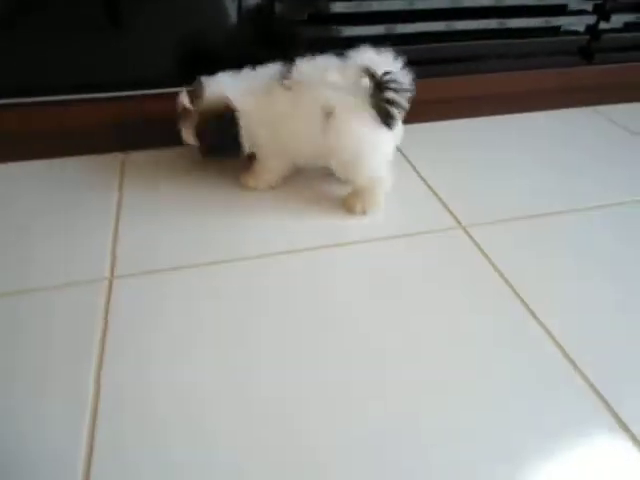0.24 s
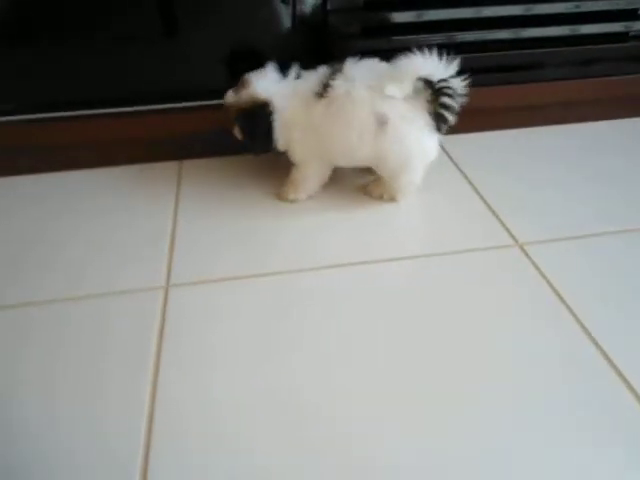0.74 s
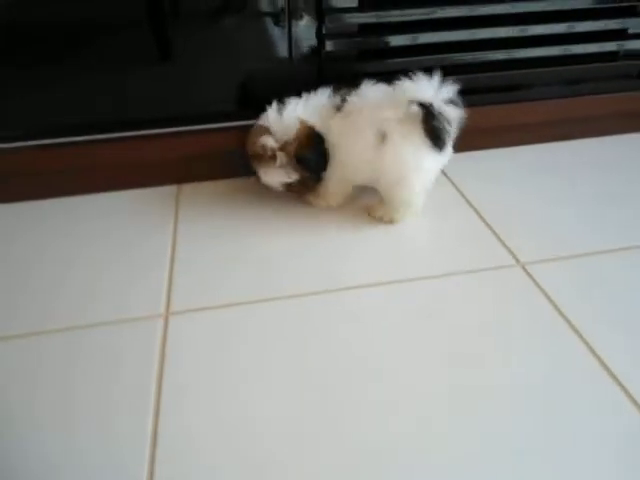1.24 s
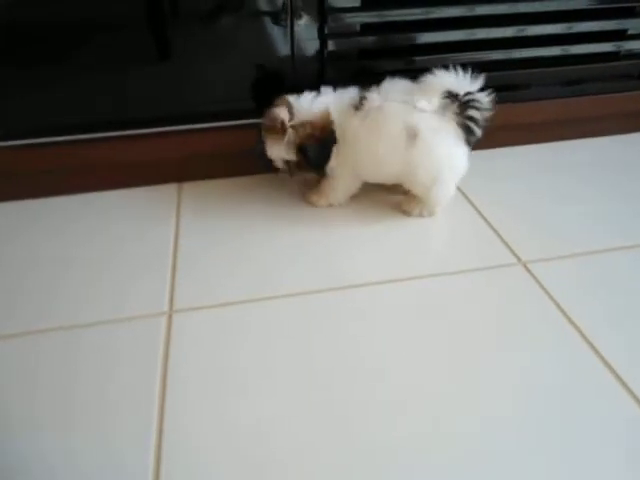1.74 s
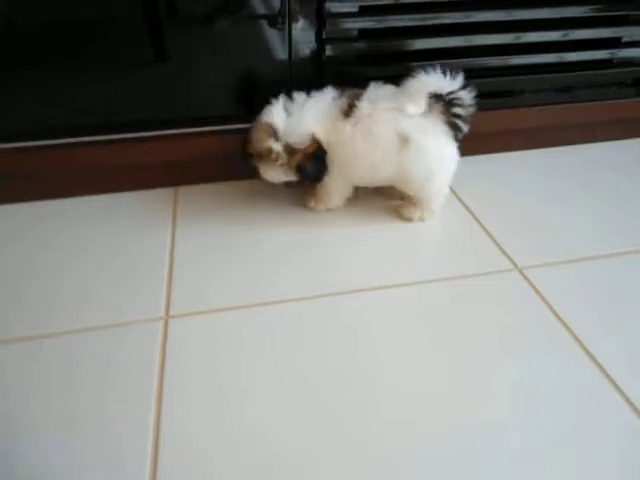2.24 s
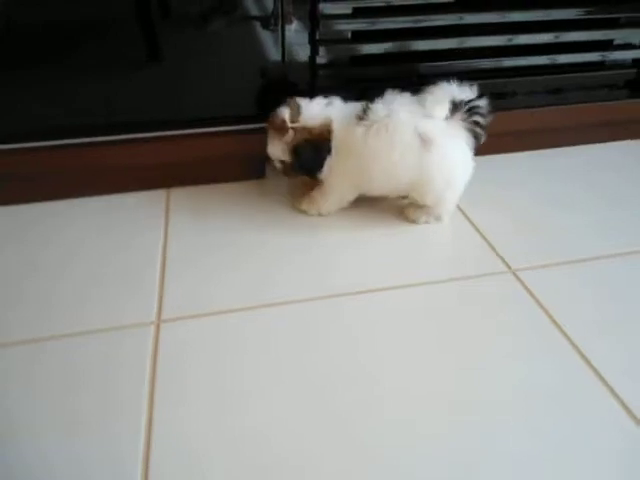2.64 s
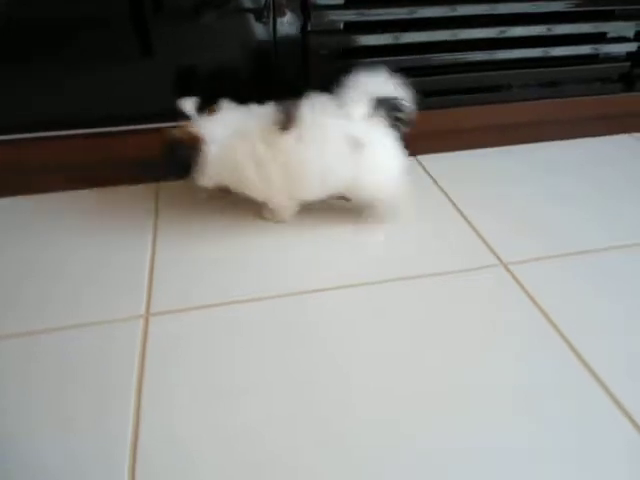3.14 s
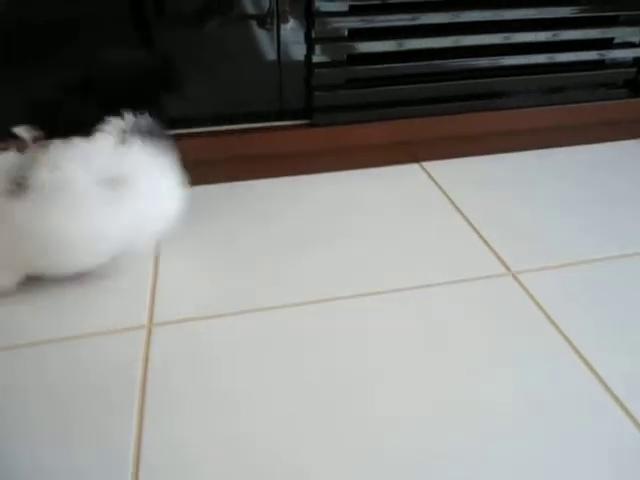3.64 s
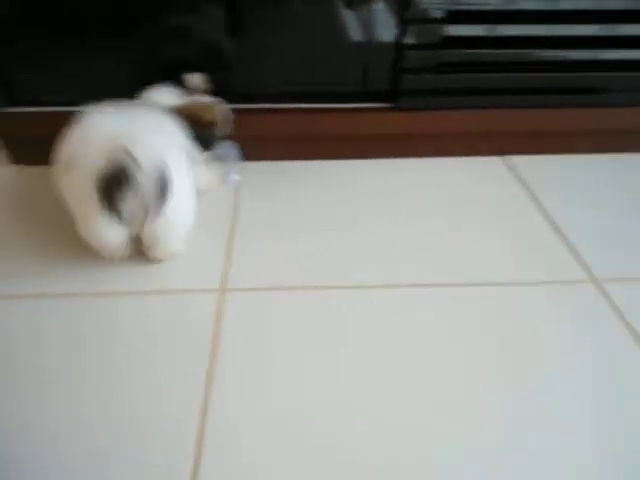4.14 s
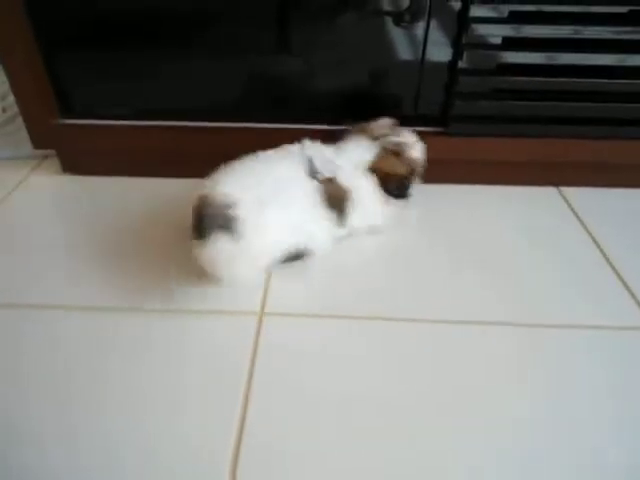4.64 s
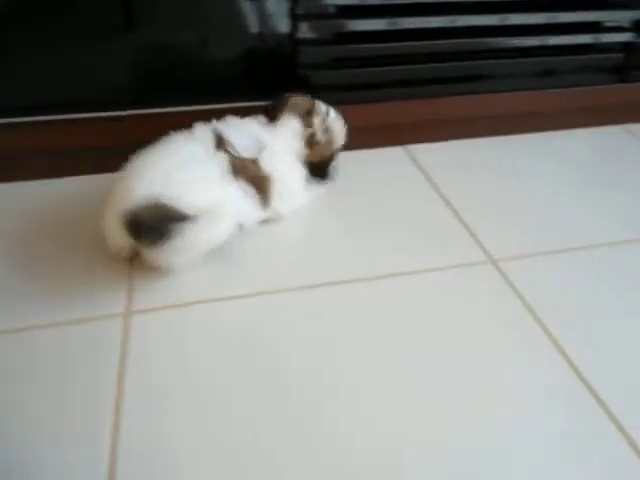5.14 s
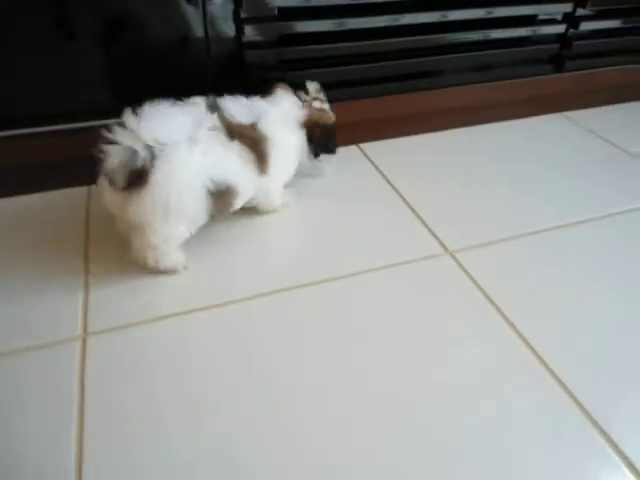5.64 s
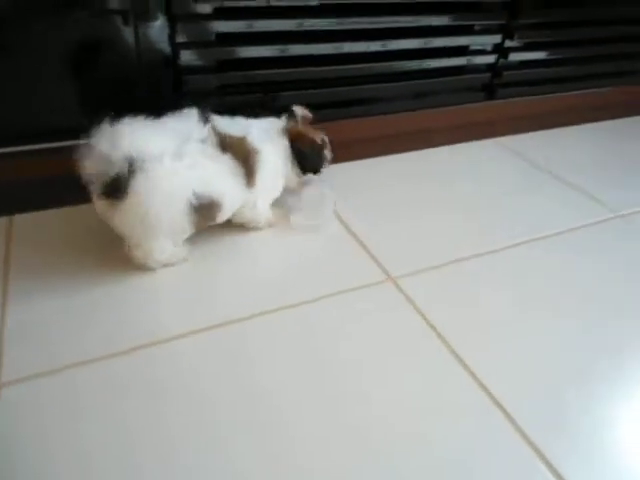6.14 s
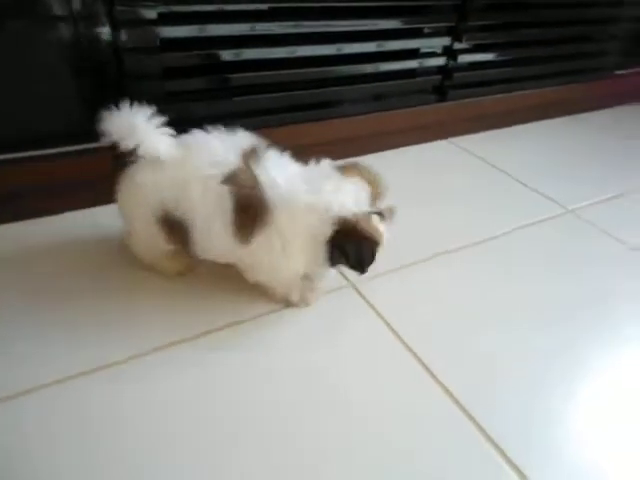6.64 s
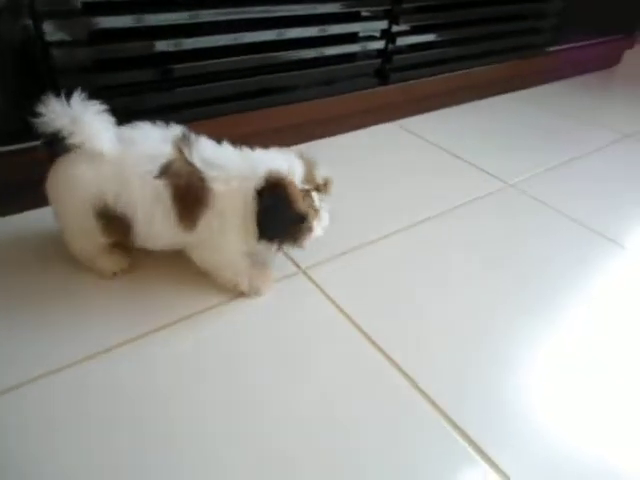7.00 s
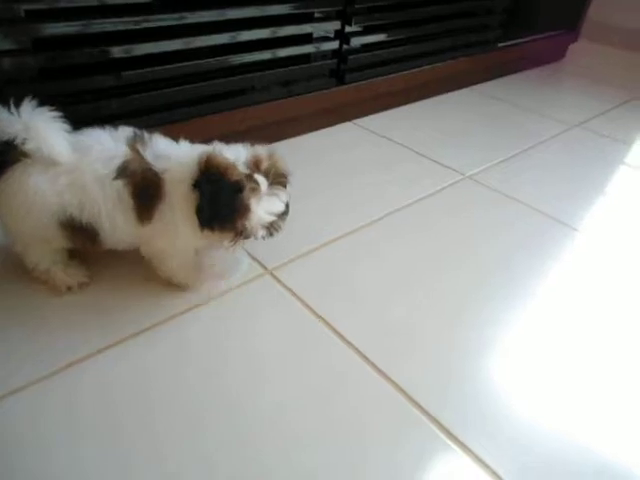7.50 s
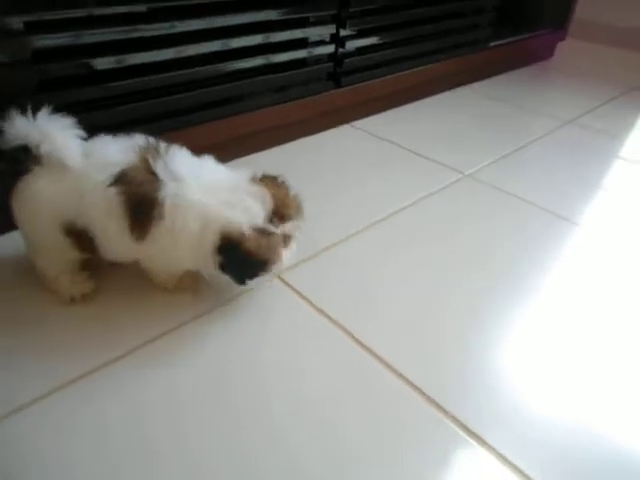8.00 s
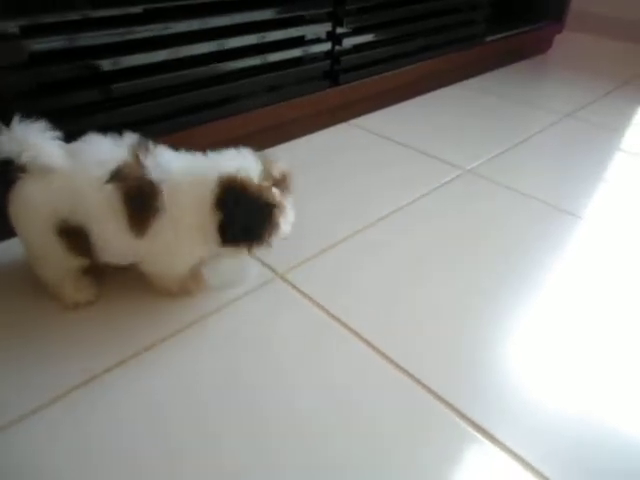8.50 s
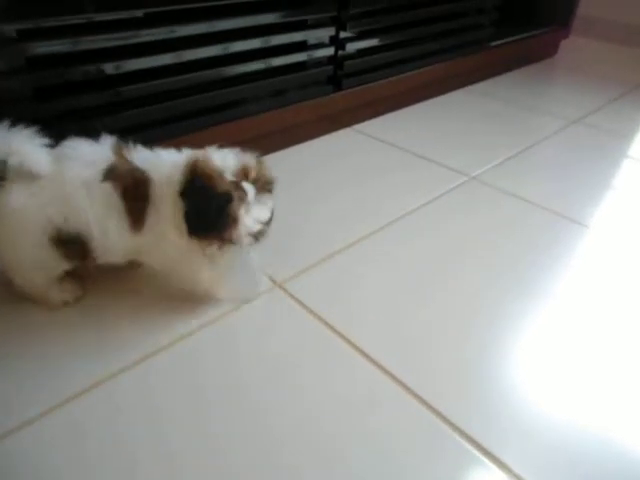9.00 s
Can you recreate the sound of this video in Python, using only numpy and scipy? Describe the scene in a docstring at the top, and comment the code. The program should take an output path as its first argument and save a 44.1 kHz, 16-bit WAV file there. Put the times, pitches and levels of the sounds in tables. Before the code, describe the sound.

A light plastic cup bounces, rattles and slides on tiles as a puppy paws it, its claws clicking in a bare room.

```python
"""A bare, echoing room with a tiled floor, where a puppy noses and paws a small plastic cup about.
The cup knocks, bounces and rattles as each blow rings its hollow modes; claws and the hard rim
add sharp ticks and a grainy scrape, and paws land with soft thuds. Building rumble and microphone
hiss lie below; the loudest knocks overload a small camera."""
import sys
import numpy as np
from scipy import signal
from scipy.fft import rfft, irfft, next_fast_len
from scipy.io import wavfile

SR = 44100
rng = np.random.default_rng(int(sys.argv[2]) if len(sys.argv) > 2 else 0)


def transcribe(signal):
    """Save signal, clipped to [-1, 1], as a 16-bit WAV file at the path in sys.argv[1]."""
    frames = np.atleast_2d(signal).T
    limited = np.clip(frames, -1, 1)
    pcm = np.round(limited * 32767).astype(np.int16)
    wavfile.write(sys.argv[1], SR, pcm)


N = 408366

# knocks of the cup on the tiles: (time [s], relative level [dB], hollow pitch [Hz], tick vs knock [dB])
CUP_KNOCKS = [(0.015, -6.5, 737, -2), (0.207, -12.5, 860, -5.5), (0.239, -15.5, 877, -7),
              (0.29, -13, 747, -7.5), (0.392, -17.5, 460, -27), (0.443, -25.5, 1010, 6.5),
              (0.621, -24.5, 467, -1), (0.995, -17, 720, -35), (1.072, -24.5, 446, -2),
              (1.131, -21, 570, -6), (1.176, -21, 599, -1), (1.383, -21.5, 738, -21),
              (1.478, -13.5, 985, -19), (1.52, -12.5, 634, -9.5), (1.725, -8.5, 750, -24),
              (1.735, -12, 700, -35), (1.747, -16, 616, -16.5), (1.863, -22.5, 788, -32),
              (1.895, -21.5, 780, -20), (2.05, -24, 708, -14), (2.065, -14, 638, -11), (2.152, -28, 719, 1),
              (2.207, -21.5, 592, -4), (2.337, -24, 726, -8), (2.928, -11.5, 895, -8),
              (2.978, -22.5, 564, -11), (3.027, -11, 889, -14), (3.064, -18, 934, -25.5),
              (3.11, -14.5, 557, -25), (3.166, -16.5, 748, -12), (3.312, -16, 696, -13),
              (3.332, -7.5, 797, -27), (3.4, -6, 1020, -6), (3.404, -1, 1000, -30), (3.412, -1, 790, -8),
              (3.425, -6, 790, -22), (3.461, -12, 1035, -32), (3.474, -4.5, 890, -15),
              (3.503, -12, 777, -34), (3.539, -13.5, 980, -23), (3.586, -5.5, 945, -28),
              (3.611, 1.5, 956, -22), (3.631, -4.5, 890, -35), (3.652, -9.5, 940, -24),
              (3.661, -4, 920, -25.5), (3.697, -9.5, 975, -34), (3.708, -11.5, 920, -32),
              (3.744, -11.5, 743, -14), (3.77, -12, 670, -29.5), (3.878, -17.5, 580, -24),
              (3.966, -6, 706, -10.5), (4.024, -9.5, 462, -19), (4.052, -5.5, 762, -18),
              (4.18, -17, 755, -26), (4.198, -10.5, 679, -7.5), (4.27, 1, 750, -17),
              (4.308, -5.5, 992, -0.5), (4.316, -3.5, 760, -44), (4.359, 0.5, 750, -10),
              (4.504, -13.5, 770, -24), (4.522, -9.5, 750, -16), (4.574, -11, 997, -41),
              (4.59, 6, 1300, -8), (4.733, -26, 547, 1.5), (4.851, 5.5, 922, -4.5), (4.86, -4.5, 738, 4),
              (4.938, -5, 902, -7), (4.967, -8, 931, -15), (5.203, -5.5, 665, -22), (5.219, -3, 810, -5),
              (5.505, -6.5, 680, -17.5), (5.549, -8, 677, -2.5), (5.639, -2, 915, -15),
              (5.645, -2.5, 850, -8.5), (5.721, -15.5, 960, -9), (5.855, -17, 907, -27.5),
              (5.954, -5.5, 827, -11), (6.038, -18.5, 756, -19), (6.111, -16, 676, -18),
              (6.127, -7.5, 1024, -6.5), (6.138, -5.5, 1056, -9), (6.149, -27, 596, -6),
              (6.158, -7.5, 936, -27), (6.201, -4.5, 843, -16), (6.213, -9.5, 842, -21),
              (6.244, -16, 1010, -13), (6.444, -18, 836, -2.5), (6.526, -12.5, 1020, -27),
              (6.537, -13, 986, -5.5), (6.543, -9, 400, -15), (6.6, -7.5, 873, -6),
              (6.793, -7.5, 600, -10.5), (6.84, -19, 500, -13), (6.997, -19, 520, -14),
              (7.059, -20.5, 732, -11), (7.197, -18, 556, -12), (7.637, -31, 524, -7),
              (7.785, -24.5, 730, 0.5), (7.857, -12, 894, -9), (8.009, -24.5, 1074, -1),
              (8.079, -17.5, 700, -14.5), (8.212, -30.5, 900, -12), (8.374, -27, 680, -1),
              (8.461, -10.5, 810, -12.5), (8.472, -13.5, 760, -23), (8.483, -14.5, 760, -23),
              (8.797, -18.5, 750, -23), (8.849, -25, 650, -3), (8.893, -17, 580, -12),
              (8.928, -20, 702, -21), (9.025, -17, 926, -28), (9.068, -3, 860, -14), (9.077, -7, 840, -28),
              (9.089, -14, 930, -19), (9.107, -19, 768, -19), (9.112, -4.5, 790, -15.5),
              (9.127, -7, 729, -16), (9.145, -32, 866, -30), (9.172, -24, 737, -28), (9.21, -5, 752, -31),
              (9.239, -7.5, 611, -33)]
# the cup is pushed, rocks and slides: (start [s], length [s], relative rattle [dB], relative scrape [dB])
CUP_SLIDES = [(0.0, 0.0079, -25, -31.5), (0.196, 0.37, -39.5, -33.5), (1.118, 0.43, -38.5, -38),
              (1.75, 0.15, -43, -47), (2.05, 0.33, -46.5, -40), (3.014, 0.17, -30.5, -30.5),
              (3.404, 0.33, -34, -34.5), (3.942, 0.12, -29, -29.5), (4.272, 0.17, -30.5, -30),
              (4.599, 0.02, -18.5, -19), (4.871, 0.036, -42, -19), (4.998, 0.02, -31, -46.5),
              (5.243, 0.055, -36, -33.5), (5.562, 0.099, -31, -27), (5.968, 0.1, -35, -30.5),
              (6.118, 0.065, -24.5, -34), (6.237, .1, -44, -38), (6.5, 0.19, -55, -36),
              (7.075, 0.055, -36, -37), (7.97, 0.045, -46.5, -38), (8.873, 0.29, -42, -37),
              (9.208, .1, -49.5, -31.5)]


def from_db(db):
    return 10 ** (np.asarray(db) / 20)


def unit_rms(x):
    return x / np.sqrt(np.mean(x ** 2) + 1e-20)


def at_hz(points, hz):
    """A (frequency [Hz], value) curve read on a log-frequency axis."""
    point_hz, values = np.transpose(points)
    return np.interp(np.log(hz + 1), np.log(point_hz), values)


def coloured_noise(spectrum):
    """Noise shaped by a (frequency [Hz], level [dB]) curve, at rms 1."""
    gain = from_db(at_hz(spectrum, np.fft.rfftfreq(N, 1 / SR)))
    return unit_rms(irfft(rfft(rng.standard_normal(N)) * gain, N))


def ring(drive, hz, t60):
    """One resonance: a unit click sets off a decaying sine of height about 1."""
    radius, angle = from_db(-60 / (t60 * SR)), 2 * np.pi * hz / SR
    return signal.lfilter([0, np.sin(angle)], [1, -2 * radius * np.cos(angle), radius ** 2], drive + 1e-18)


def bursts(times, level_db, t60):
    """An envelope that jumps at the given times and dies away."""
    jumps = np.zeros(N)
    jumps[(times * SR).astype(int)] = from_db(level_db)
    return signal.lfilter([1], [1, -from_db(-60 / (t60 * SR))], jumps + 1e-18)


def struck_cup(onsets, strength_db, hollow_hz, spread_octaves, uneven_db=2.5, travel_s=0.0009):
    """Blows ring the cup; its tilt favours the modes near each blow's hollow pitch."""
    # modes of the plastic cup: (frequency [Hz], relative level [dB], t60 [s])
    modes = [(306, -25, 0.0083), (473, 1.5, 0.036), (614.4, -1.5, 0.028), (692, -3, 0.038),
             (768, -1, 0.042), (915, 0.5, 0.031), (1008, -5.5, 0.063), (1090, -12.5, 0.03),
             (1300, -11, 0.025), (1497, -23, 0.089)]
    hz, level_db, t60 = np.transpose(modes)
    detune = np.log2(hz / hollow_hz[:, None]) / np.clip(spread_octaves, .1, 2)[..., None]
    shares = from_db(level_db - 7.7 * detune ** 2 + uneven_db * rng.standard_normal(detune.shape))
    shares = shares / np.linalg.norm(shares, axis=1, keepdims=True) * from_db(strength_db)[:, None]
    # a blow takes a moment to reach every part of the cup
    delays = (rng.random(detune.shape) * travel_s * SR).astype(int)
    starts = np.minimum(onsets[:, None] + delays, N - 1)
    body = np.zeros(N)
    for k in range(len(modes)):
        clicks = np.zeros(N)
        clicks[starts[:, k]] = shares[:, k]
        body += ring(clicks, hz[k], t60[k])
    # light plastic gives way, so each ring swells over a cycle or two
    return signal.sosfilt(signal.butter(3, [330, 1400], "band", fs=SR, output="sos"), body)


def knocks(trim_db=-2, run_octaves=0.15, rest_octaves=0.85, settle_s=0.13):
    """The cup hits the tiles: a hollow ring topped by a bright tick of claw or rim."""
    # colour of a tick: (frequency [Hz], relative level [dB])
    tick_colour = [(300, -35.5), (900, 26), (1500, 11), (2200, 2.5), (3000, 4), (3700, 4.5), (5000, 5.5),
                   (8000, -23)]
    times, level_db, hollow_hz, tick_db = np.transpose(CUP_KNOCKS)
    # a knock out of rest wakes a broad ring, one in a quick run of bounces a narrow one
    rested = 1 - np.exp(-np.diff(times, prepend=-1) / settle_s)
    spread_octaves = run_octaves + (rest_octaves - run_octaves) * rested
    hollow = struck_cup((times * SR).astype(int), level_db + trim_db, hollow_hz, spread_octaves)
    ticks = bursts(times, level_db + tick_db + trim_db, t60=0.021) * coloured_noise(tick_colour)
    return hollow + ticks


def slide_envelope(levels_db, fall_db_per_s, rise_db_per_s=508):
    """Every slide rises fast, holds for its length and dies away."""
    t, envelope = np.arange(0, N / SR, 0.001), 0
    for (start, length, *_), db in zip(CUP_SLIDES, levels_db):
        early, late = np.maximum(start - t, 0), np.maximum(t - start - length, 0)
        envelope += from_db(db - rise_db_per_s * early - fall_db_per_s * late)
    return np.interp(np.arange(N) / SR, t, envelope)


def rattle(touches_per_s=130, trim_db=-3, size_spread_db=2, rock_hz=760, follow=0.66):
    """The rocking rim touches down at random, its pitch drawn towards that of the nearby knocks."""
    _, _, rattle_db, _ = np.transpose(CUP_SLIDES)
    knock_times, _, knock_hz, _ = np.transpose(CUP_KNOCKS)
    onsets = np.flatnonzero(rng.random(N) < touches_per_s / SR)
    nearby_hz = np.interp(onsets / SR, knock_times, knock_hz)
    hollow_hz = rock_hz * (nearby_hz / rock_hz) ** follow
    sizes_db = size_spread_db * np.minimum(rng.exponential(1, len(onsets)), 3)
    touches = unit_rms(struck_cup(onsets, sizes_db, hollow_hz, spread_octaves=0.82))
    return slide_envelope(rattle_db + trim_db, fall_db_per_s=116.5) * touches


def scrape(grains_per_s=2500, trim_db=-4):
    """Claws and rim drag over the tiles: tiny catches blur into a bright, grainy noise."""
    # colour of the scrape: (frequency [Hz], relative level [dB])
    colour = [(700, -18), (1600, -2.5), (3000, -1.5), (4300, -2.5), (5300, -1)]
    _, _, _, scrape_db = np.transpose(CUP_SLIDES)
    catches = (rng.random(N) < grains_per_s / SR) * rng.exponential(1, N)
    grains = signal.lfilter([1], [1, -.995], catches)
    friction = unit_rms(grains * coloured_noise(colour))
    return slide_envelope(scrape_db + trim_db, fall_db_per_s=90) * friction


def pitched_clicks(ring_cycles=8.1, contact_t60=0.0088, trim_db=-3):
    """A brief, rough contact with the glaze rings a claw tip or the rim for a few cycles."""
    # sharp clicks of claw or rim, mostly on the cup's knocks: (time [s], relative peak [dB], pitch [Hz])
    clicks = [(0.2896, -19.5, 2380), (0.305, -18, 2300), (1.5206, -25, 3290), (2.1986, -20, 1740),
              (2.22, -23, 2860), (2.9277, -20, 1850), (3.1848, -10, 4900), (3.401, -18, 3700),
              (3.414, -11, 2670), (3.61, -17, 3400), (3.629, -26, 3340), (4.272, -15.5, 2200),
              (4.306, -20.5, 1640), (4.591, 1, 2130), (4.852, 1, 2130), (5.5506, -5.5, 1970),
              (5.643, -9, 3630), (5.988, -30, 3270), (5.995, -17, 5000), (6.127, -14, 2160),
              (6.129, -6.5, 4800), (6.149, -17, 4800), (6.159, -11, 4900), (6.157, -29, 1600),
              (6.528, -28, 2440), (7.786, -17, 1980), (8.848, -27, 1890)]
    t, track = np.arange(SR // 20) / SR, np.zeros(N)
    for start, peak_db, hz in clicks:
        jolt = rng.standard_normal(len(t)) * from_db(-60 * t / contact_t60)
        click = ring(jolt, hz, ring_cycles / hz)
        track[int(start * SR):][:len(t)] += from_db(peak_db + trim_db) * click / np.abs(click).max()
    return track


def paw_thuds(centre_hz=130, gain_db=18):
    """A paw pushes on the floor: a low, soft burst of noise."""
    # heavy paw falls: (time [s], relative level [dB])
    paw_falls = [(1.375, -26), (2.922, -33.5), (3.414, -19), (3.964, -37), (4.262, -23.5), (4.582, -29),
                 (4.847, -20), (5.195, -39.5), (5.544, -34.5), (5.627, -46), (5.944, -40.5)]
    times, level_db = np.transpose(paw_falls)
    low_band = signal.butter(2, [centre_hz / 2, centre_hz * 2], "band", fs=SR, output="sos")
    return signal.sosfilt(low_band, bursts(times, level_db + gain_db, t60=0.27) * rng.standard_normal(N))


def room(direct, first_echo_s=0.0033, patterns=6):
    """Bare walls return dense echoes, each band dying at its own rate."""
    # reverberation time: (frequency [Hz], t60 [s])
    decay_times = [(150, 0.67), (400, 0.56), (1000, 0.52), (2500, 0.3), (5000, 0.18)]
    t, tails = np.arange(SR) / SR, 0
    edges_hz = 60 * 2 ** np.arange(0, 7.1, .5)
    for low, high in zip(edges_hz, edges_hz[1:]):
        band = signal.butter(2, [low, high], "band", fs=SR, output="sos")
        decay = from_db(-60 * t / at_hz(decay_times, np.sqrt(low * high)))
        tails += signal.sosfilt(band, rng.standard_normal((patterns, SR))) * decay
    tails *= np.clip(t / first_echo_s - 1, 0, 1)
    # the echo pattern switches eight times a second, standing for the cup moving about
    pattern = np.arange(N) // (SR // 8) % patterns
    size = next_fast_len(N + SR)
    echoes = sum(rfft(direct * (pattern == k), size) * rfft(tail, size) for k, tail in enumerate(tails))
    return irfft(echoes, size)[:N] / np.sqrt(np.sum(tails ** 2) / patterns)


def rumble(level_db=-34.5):
    """The building's steady, deep rumble."""
    # colour of the rumble: (frequency [Hz], relative level [dB])
    colour = [(8, 2), (20, -5.5), (31, -5), (44, -0.5), (49, -2.5), (57, -17), (75, -45.5)]
    return from_db(level_db) * coloured_noise(colour)


def hiss(level_db=-39):
    """A steady bed of microphone hiss and distant room noise."""
    # colour of the bed: (frequency [Hz], relative level [dB])
    colour = [(30, 14), (70, 4), (150, 4), (400, -4), (1200, -9), (2200, -7), (3250, 1.5), (4300, -8.5),
              (5200, -3), (7000, -26.5)]
    return from_db(level_db) * coloured_noise(colour)


def scene(room_db=-10):
    """Cup, claws and paws with their echoes, over rumble and hiss, in mono."""
    direct = knocks() + pitched_clicks() + paw_thuds() + rattle() + scrape()
    return (direct + from_db(room_db) * room(direct) + rumble() + hiss())[None]


def record(dry, edge_hz=5007, leak_db=-21, wall_hz=5950, ceiling=0.71, knee=30, top_hz=15800):
    """The camera cuts the treble in two steps, then flattens overloaded peaks, which spits brief highs."""
    dulled = signal.sosfiltfilt(signal.butter(10, edge_hz, fs=SR, output="sos"), dry)
    wall = signal.ellip(10, 1, 70, wall_hz, fs=SR, output="sos")
    narrow = signal.sosfilt(wall, dulled + from_db(leak_db) * dry)   # some treble passes the first step
    clipped = narrow / (1 + np.abs(narrow / ceiling) ** knee) ** (1 / knee)
    return signal.sosfilt(signal.cheby2(12, 70, top_hz, fs=SR, output="sos"), clipped)


dry = scene()
out = record(dry)
transcribe(out)
```